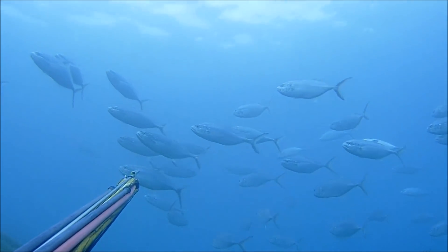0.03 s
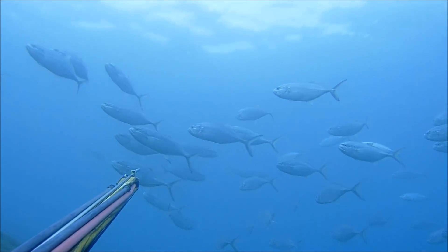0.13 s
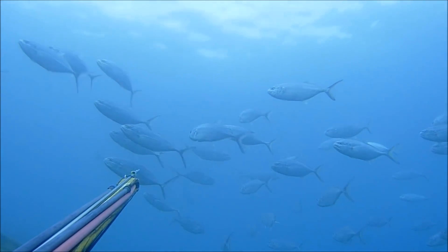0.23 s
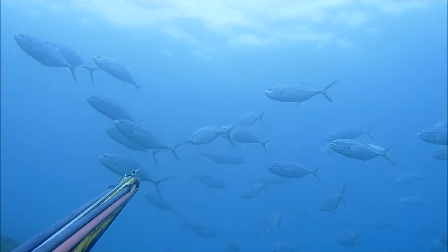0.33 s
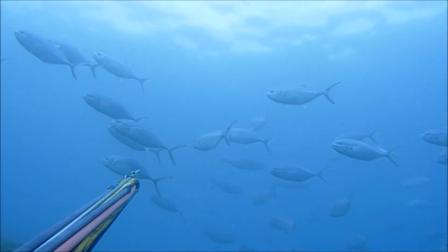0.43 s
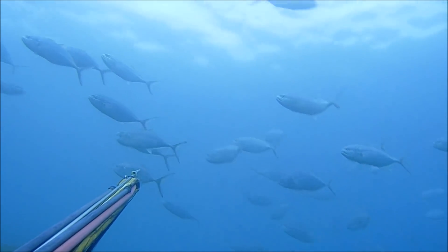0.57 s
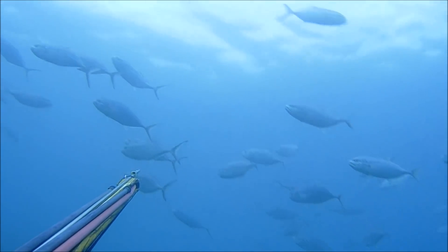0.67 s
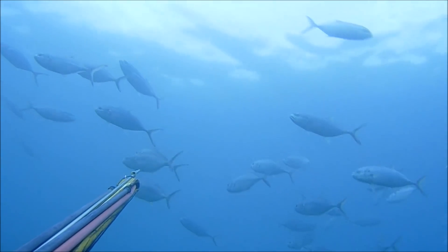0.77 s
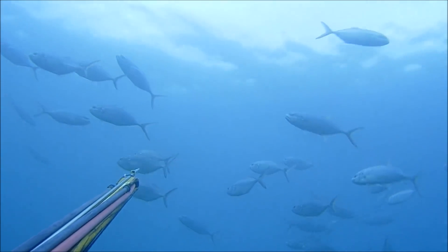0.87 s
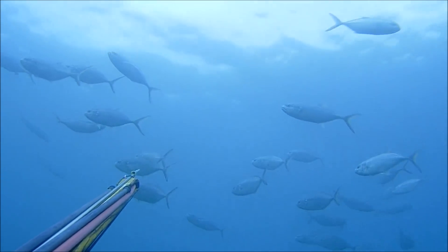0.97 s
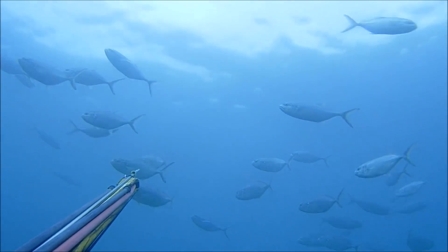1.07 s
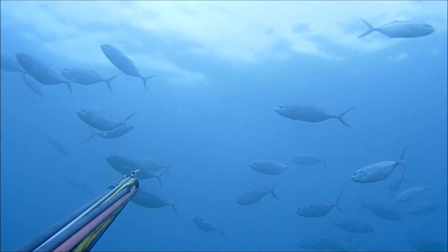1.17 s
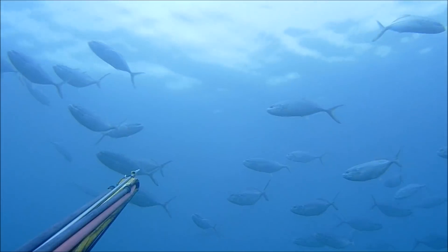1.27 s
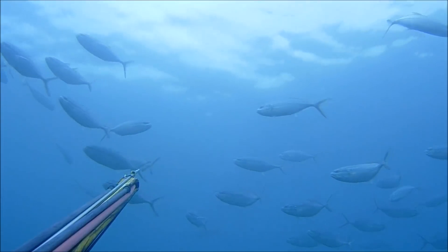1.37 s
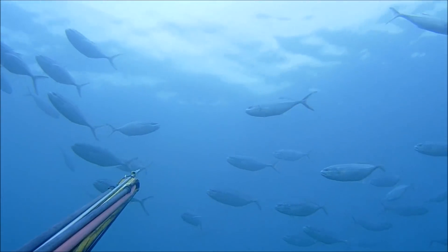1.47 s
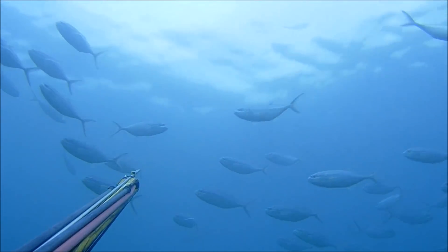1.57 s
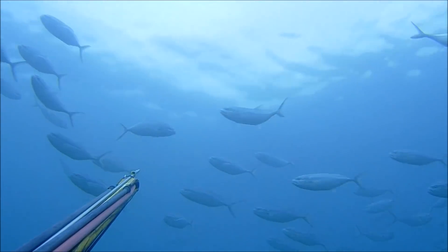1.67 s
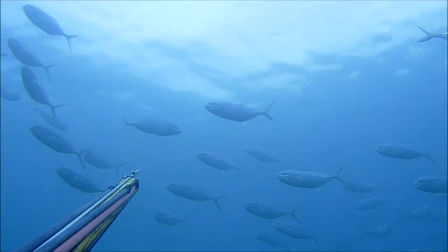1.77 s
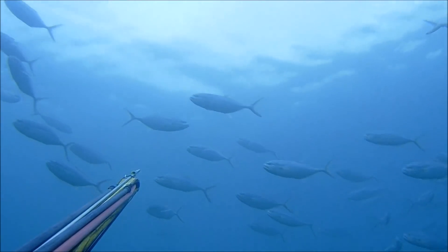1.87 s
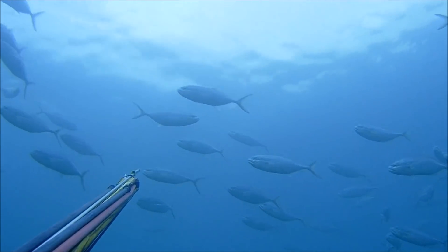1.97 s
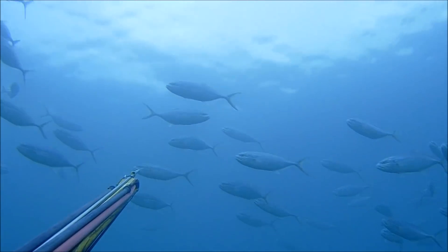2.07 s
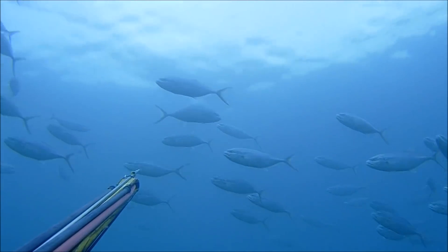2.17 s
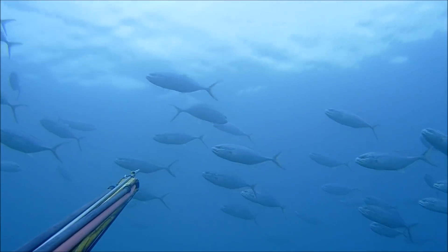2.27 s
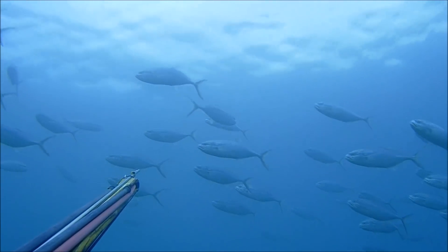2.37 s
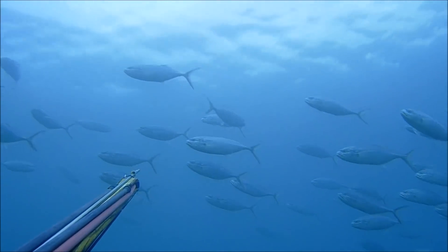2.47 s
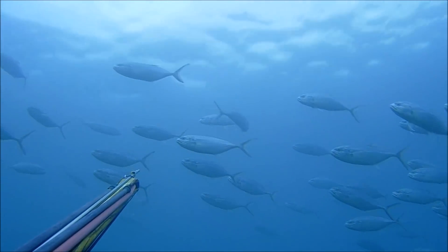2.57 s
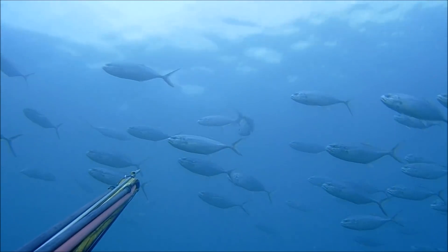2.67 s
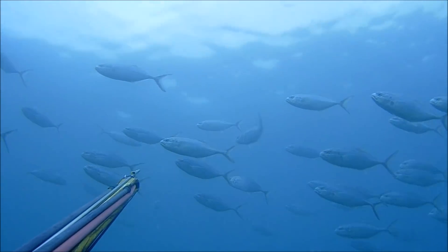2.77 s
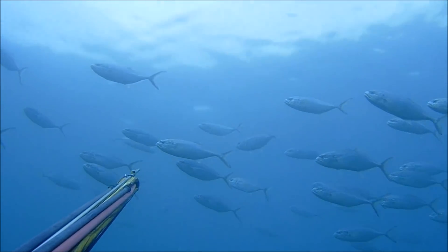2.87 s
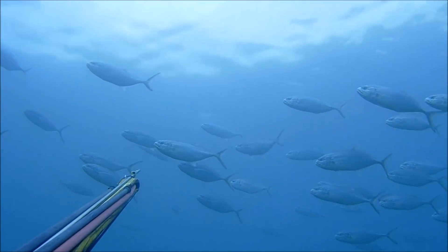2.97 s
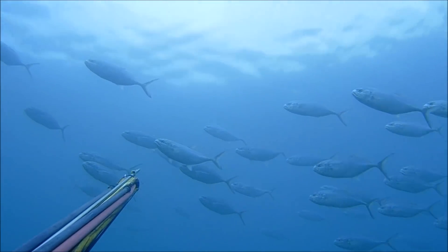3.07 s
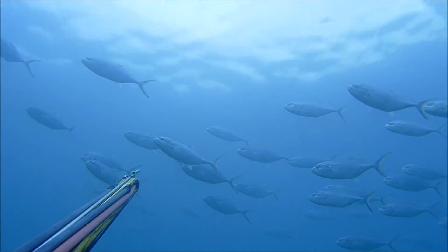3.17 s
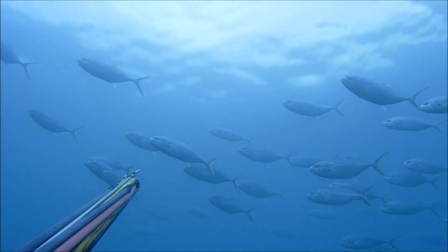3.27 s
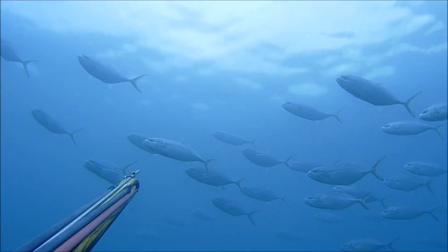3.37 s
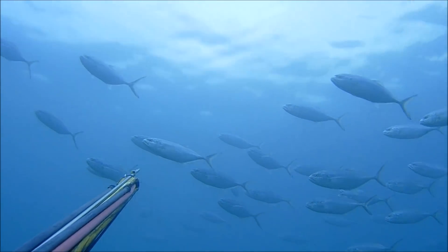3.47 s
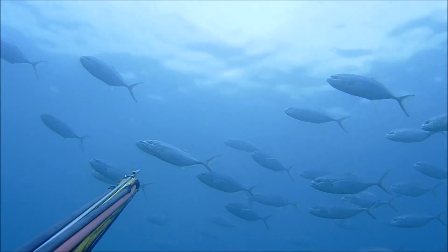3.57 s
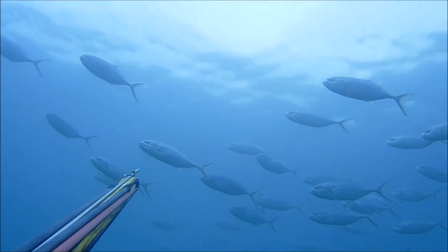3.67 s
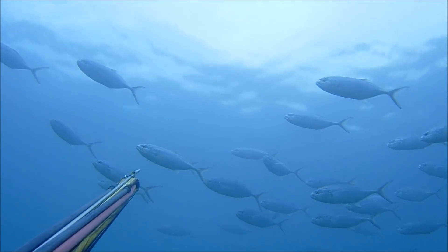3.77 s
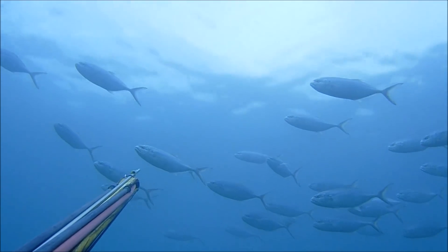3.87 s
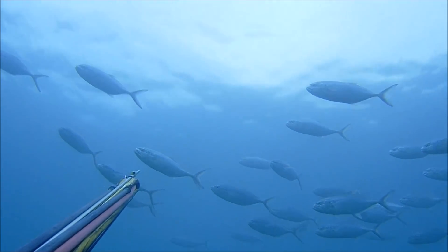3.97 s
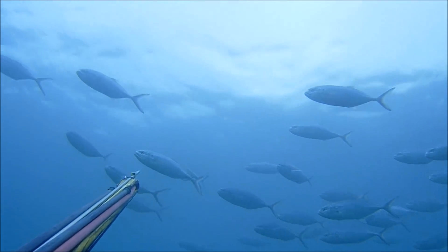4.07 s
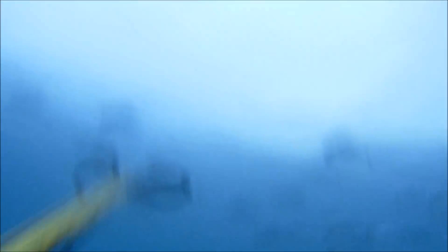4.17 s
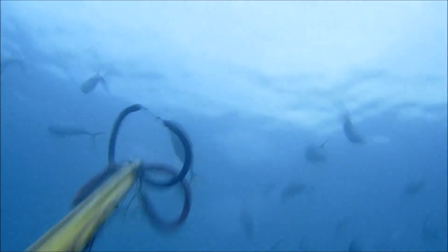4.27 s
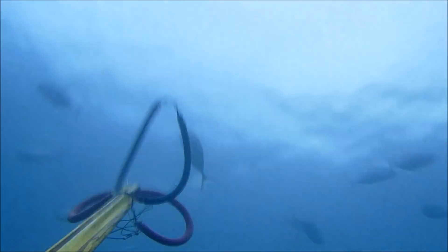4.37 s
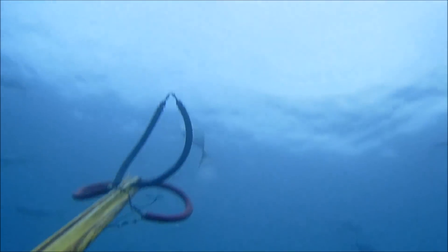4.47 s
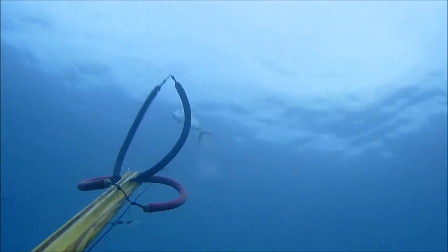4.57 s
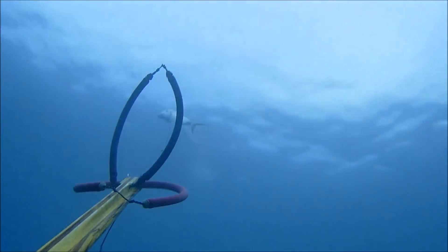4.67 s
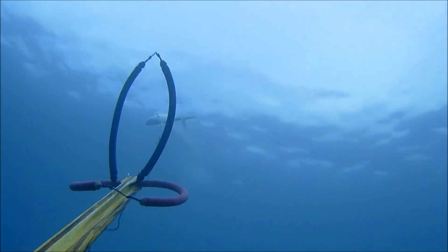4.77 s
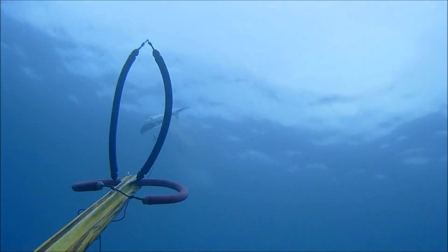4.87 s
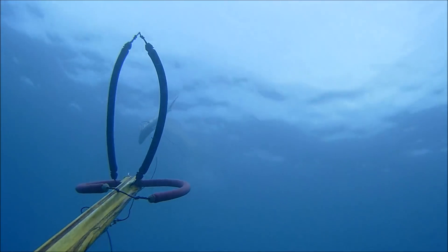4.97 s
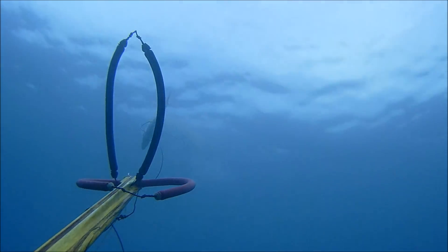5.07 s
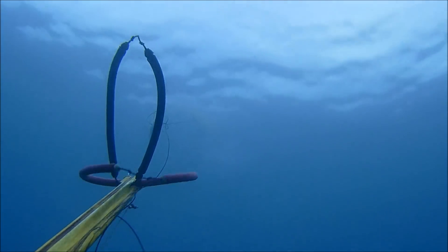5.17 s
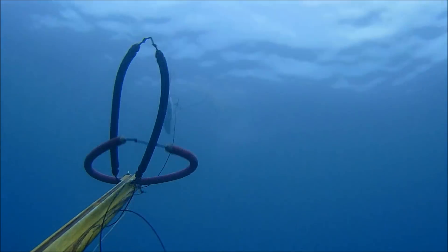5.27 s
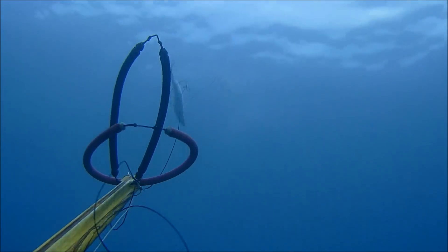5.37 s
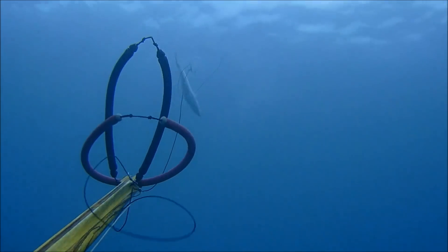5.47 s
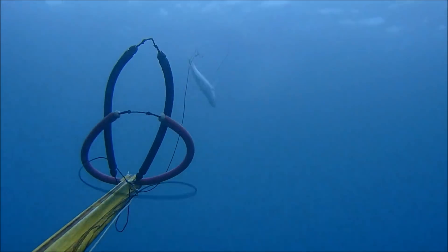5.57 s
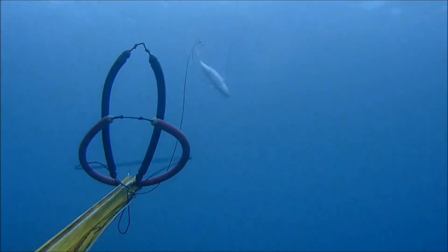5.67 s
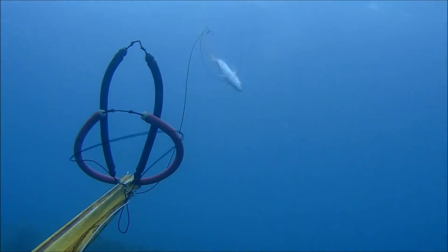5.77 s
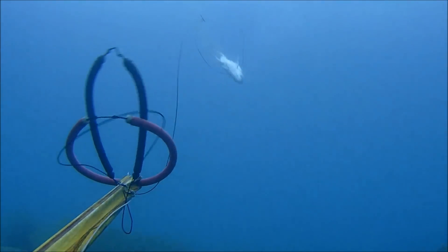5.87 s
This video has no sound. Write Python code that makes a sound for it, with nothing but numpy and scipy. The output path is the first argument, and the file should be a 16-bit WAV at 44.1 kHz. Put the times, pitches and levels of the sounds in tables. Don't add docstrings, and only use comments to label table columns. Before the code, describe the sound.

Beneath the sea, muffled water and tiny ticks are broken by one harsh, overloaded speargun shot, followed by clattering bands and a few faint bubbles.

```python
import sys
import numpy as np
from scipy import signal
from scipy.fft import rfft, irfft
from scipy.io import wavfile
from scipy.ndimage import uniform_filter1d

SR = 44100
rng = np.random.default_rng(int(sys.argv[2]) if len(sys.argv) > 2 else 0)


def attenuation_scalar(level_db):
    decades = np.asarray(level_db, float) / 20
    return 10 ** decades


def dump(signal):
    limited = np.clip(np.atleast_2d(signal).T, -1, 1)
    pcm = np.round(limited * 32767).astype(np.int16)
    wavfile.write(sys.argv[1], SR, pcm)


N = 261072


def curve(rows):
    times, values = np.transpose(rows)
    return np.interp(np.arange(N) / SR, times, values)


def unit(x):
    return x / np.sqrt(np.mean(x ** 2))


def band(x, lo_hz, hi_hz, order=2):
    return signal.sosfilt(signal.butter(order, [lo_hz, hi_hz], "band", fs=SR, output="sos"), x)


def walk(rate):
    hold = int(SR / rate)
    steps = np.repeat(rng.standard_normal(N // hold + 1), hold)
    return 1.3 * uniform_filter1d(uniform_filter1d(steps, hold), hold)[:N]


def swells(rows, rest_db):
    t = np.arange(N) / SR
    return attenuation_scalar(rest_db) + sum(attenuation_scalar(db) * np.exp(-((t - s) / half) ** 2) for s, half, db in rows)


def kick(peak_db, hold_s, fade_db_per_s):
    age = np.arange(N) / SR - 4.16
    rise = np.clip(age / 0.0067, 0, 1)
    return rise * attenuation_scalar(peak_db - fade_db_per_s * np.maximum(age - hold_s, 0))


def grit(rate, scatter_db):
    hit = rng.random(N) < rate / SR
    size = np.minimum(rng.exponential(size=N), 3)
    return unit(hit * attenuation_scalar(scatter_db * size) * rng.standard_normal(N))


def ring(x, modes):
    out = 0
    for hz, db, t60 in modes:
        pole = np.exp((2j * np.pi * hz - np.log(1000) / t60) / SR)
        out = out + attenuation_scalar(db) * signal.lfilter([1], [1, -pole], x + 1e-18).imag
    return out


def struck(modes, push, detune, lean_db=0):
    age = np.arange(3000) / SR
    out = 0
    for (hz, db, t60), off in zip(modes, detune):
        octaves_up = np.log2(hz / modes[0][0])
        tone = np.sin(2 * np.pi * hz * (1 + off) * age) * np.exp(-np.log(1000) * age / t60)
        out = out + attenuation_scalar(db + lean_db * octaves_up) * tone
    out = np.convolve(out, push)[:len(age)]
    return out / np.abs(out).max()


def snap(noise, lo_hz, hi_hz, fade_ms):
    fade = np.exp(-np.arange(len(noise)) / SR / (fade_ms / 1000))
    out = band(noise * fade, lo_hz, hi_hz, order=1)
    return out / np.abs(out).max()


def add(out, s, sound):
    i = int(s * SR)
    out[i:i + len(sound)] += sound[:N - i]


# f/Hz, level/dB per Hz
WATER_SPECTRUM = [(35, -33), (60, -5), (160, -1), (274, 0.5), (398, -2), (566, -3.5), (621, -4),
                  (1780, -16), (3270, -22), (3580, -17), (5090, -26), (14900, -31.5), (16000, -39)]


def water():
    out, swell = 0, walk(3.34)
    hzs, dbs = np.transpose(WATER_SPECTRUM)
    for hz in 70 * 2 ** np.arange(0, 8, .5):
        db = np.interp(np.log(hz), np.log(hzs), dbs) + 10 * np.log10(hz)
        db = db + 0.9 * swell + 0.2 * walk(12)
        out = out + attenuation_scalar(db) * unit(band(rng.standard_normal(N), hz * 2 ** -.25, hz * 2 ** .25))
    return attenuation_scalar(-53) * unit(out)


# f/Hz, level/dB, t60/s
SHELL_HIGH = [(2257, -5, 0.024), (2497, -4.5, 0.049), (2628, -7.5, 0.05), (3116, 0, 0.0091),
              (3585, 2, 0.02), (3884, -7, 0.038), (4707, -13, 0.049), (6010, -13, 0.023)]
# centre t/s, half width/s, level/dB
FIZZ = [
    (.45, 0.28, -52.5),
    (.93, 0.14, -60.5),
    (1.65, .12, -66.5),
    (2.8, 0.079, -69),
    (3.68, 0.28, -69),
    (5.25, 0.19, -67),
    (5.9, 0.15, -70),
]


def fizz():
    modes = sum(ring(grit(1800, scatter_db=2.0), [(hz, db, .6 * t60)]) for hz, db, t60 in SHELL_HIGH)
    flicker = attenuation_scalar(-4.5 + 1.8 * walk(8.2))
    return swells(FIZZ, rest_db=-64) * flicker * unit(modes)


# centre t/s, half width/s, level/dB
SURGES = [
    (1.4, .15, -65),
    (3.5, 0.26, -58),
    (4.75, 0.33, -51),
    (5.6, .4, -59.5),
]


def motion():
    sway = unit(band(rng.standard_normal(N), 18, 38, order=3))
    sway_gain = swells(SURGES, rest_db=-63) + kick(-25.5, -0.0039, 126)
    barrel = [(115.6, 1, 0.1), (144, -15, 0.17), (208.4, -8.5, 0.16), (250, -4, 0.025)]  # Hz, dB, t60 s
    hum = unit(ring(rng.standard_normal(N), barrel))
    hum_gain = attenuation_scalar(-65) + kick(-14, 0.1087, 166) + kick(-30, 0, 43.5)
    return sway_gain * sway + attenuation_scalar(-1) * hum_gain * hum


def scrapes(rows):
    out, ms = np.zeros(N), np.arange(1500) / SR * 1000
    for s, db, lean_db, snap_db, scrape_ms in rows:
        noise = rng.standard_normal(3000)
        push = noise[:1500] * (np.exp(-ms / scrape_ms) + attenuation_scalar(-11.5) * np.exp(-ms / 11))
        modes = [(hz, g + 3 * rng.standard_normal(), .7 * t60) for hz, g, t60 in SHELL_HIGH]
        body = struck(modes, push, 0.03 * rng.standard_normal(8), lean_db)
        wide = snap(noise, 2400, 4100, fade_ms=0.69 * scrape_ms)
        bare = snap(noise, 6000, 7700, fade_ms=1.14 * scrape_ms)
        add(out, s, attenuation_scalar(db) * (body + attenuation_scalar(-16.5) * wide + attenuation_scalar(snap_db + 6.5) * bare))
    return out


# t/s, peak level/dB, lean to the upper modes/dB per octave, bare snap level/dB
TICKS = [(0.0729, -42.5, 4, -14.5), (0.1005, -44, -4, -11), (0.224, -44.5, 11, -30),
         (0.2378, -41.5, 7, -24), (0.709, -45, -19, -28), (0.67, -39.5, -16, -29), (0.8641, -23.5, -1, -40),
         (1.022, -44.5, 2, -26), (1.5465, -29.5, -4, -32), (1.6701, -31, -12, -33), (1.812, -43, -9, -28),
         (2.0414, -41.5, 11, -13), (2.052, -47, 5, -20), (2.134, -42, 13, -27), (2.3428, -31.5, -12, -25),
         (2.394, -41, 20, -3), (2.6044, -31, -7, -33), (2.7396, -44, -5, -25), (2.8001, -40, -15, -27),
         (2.85, -43, 12, -18), (3.1143, -43.5, 4, -17), (3.478, -38, 3, -6), (3.686, -38.5, 10, -20),
         (4.0617, -47, 11, -17), (4.104, -41, -3, -19), (5.4817, -39.5, -3, -15), (5.8693, -36, 2, -31),
         (5.875, -44, -10, -31), (2.76, -48, -6, -30), (2.775, -45, -10, -30)]


def ticks():
    return scrapes([(*row, 0.91) for row in TICKS])


# t/s, peak level/dB
CRACKLE = [
    (4.9394, -51),
    (5.0799, -51),
    (5.1148, -47),
    (5.1502, -44),
    (5.1855, -41.5),
    (5.257, -45.5),
    (5.284, -48),
    (5.3376, -43),
    (5.3951, -44),
]


def crackle():
    return scrapes([(s, db + 1.5, -7, -32, 0.91) for s, db in CRACKLE])


# t/s, peak level/dB, bare snap level/dB
RATTLE = [(4.158, -26, -20), (4.2302, -8, -16), (4.268, -25, -23), (4.291, -29, -8), (4.306, -16.5, -1.5),
          (4.33, -40, -1), (4.3638, -38, 2.5), (4.398, -46, -17), (4.429, -30, -33), (4.469, -42, -25),
          (4.564, -40, -17), (4.6076, -44, -24), (4.7623, -44.5, -17.5), (4.806, -47.5, -24.5)]


def rattle():
    return scrapes([(s, db, 2.5, snap_db, 1.7) for s, db, snap_db in RATTLE])


# f/Hz, level/dB, t60/s
SHELL_LOW = [(216, -10, 0.027), (312, -9.5, 0.022), (452, 0, 0.024), (532, -2, 0.034), (697.3, 2.5, 0.029),
             (860, -11.5, 0.016), (1010, -2, 0.013)]
SHELL_MID = [(1389, 0, 0.03), (1508, 6.5, 0.018), (1605, -4.5, 0.031), (1850, -18, 0.0084)]


def knocks(rows):
    out = np.zeros(N)
    rise = 1 - np.exp(-(np.arange(3000) / SR / 0.0013) ** 2)
    for s, db, mid_db, crack_db, soft_ms in rows:
        push = np.hanning(int(soft_ms * SR / 1000) + 3)[1:-1]
        low = struck(SHELL_LOW, push, 0.051 * rng.standard_normal(7))
        mid = struck(SHELL_MID, push, 0.062 * rng.standard_normal(4))
        crack = snap(rng.standard_normal(3000), 2600, 3500, fade_ms=2.06)
        add(out, s, attenuation_scalar(db + 5.5) * rise * (low + attenuation_scalar(mid_db + 7) * mid + attenuation_scalar(crack_db + 1.5) * crack))
    return out


# t/s, peak level/dB, mid modes level/dB, softness of contact/ms
NUDGES = [(0.869, -52, 6, 0.46), (0.913, -33, -13, 0.29), (0.943, -30, -25, 0.62), (1.089, -25, -23, 0.23),
          (5.868, -47.5, 2, .2), (5.34, -35, -29, 0.35), (0.27, -36, -14, 0.26), (1.217, -39, -23, 0.3),
          (1.533, -29, -7.5, 0.22), (1.938, -24.5, -21.5, 0.76), (3.519, -27, -20.5, 0.42),
          (3.787, -23, -18.5, 0.33), (4.986, -32, -21, 0.22), (5.396, -34, -25, 0.85)]


def nudges():
    return knocks([(s, db, mid_db, -30.5, soft_ms) for s, db, mid_db, soft_ms in NUDGES])


# t/s, peak level/dB, mid modes level/dB, crack level/dB
SLAPS = [(4.235, -1.5, -7, -6.5), (4.245, 2, -25, -17.5), (4.267, -5.5, -4, -8.5), (4.271, 1.5, -21, -20),
         (4.281, -14, -3, -13), (4.292, -9, 2, 1), (4.306, -5.5, -5, -8), (4.31, 4, -16.5, -18),
         (4.323, -23, 0, -1), (4.332, -7, -20, -33), (4.35, -0.5, -16.5, -26.5), (4.381, 4.5, -18.5, -16.5),
         (4.386, -6, -19.5, -20), (4.399, -13, -12, -24), (4.429, -12, -11.5, -45), (4.468, -27, -36, -28),
         (4.505, -16.5, -9.5, -31), (4.545, -30, -29, -28), (4.582, -12, -14, -26.5),
         (4.655, -25, -18, -36), (4.732, -21, -20.5, -41)]


def slaps():
    return knocks([(*row, 0.35) for row in SLAPS])


# t/s, f/Hz, level/dB, t60/s
RECOIL = [
    (4.171, 13.1, -6, 0.81),
    (4.201, 46.6, -6.5, 0.31),
]


def recoil():
    out = 0
    for s, hz, db, t60 in RECOIL:
        age = np.maximum(np.arange(N) / SR - s, 0)
        fade = np.exp(-np.log(1000) * age / t60) * np.minimum(age / 0.024, 1)
        out = out + attenuation_scalar(db) * np.sin(2 * np.pi * hz * age) * fade
    return out


# t/s, blow level at the input/dB
RELEASE = [
    (4.16, -32),
    (4.1625, 20.5),
    (4.178, -0.5),
    (4.22, -7),
    (4.228, -9),
    (4.245, -16),
    (4.29, -20.5),
    (4.35, -39),
    (4.6, -62.5),
]


def release():
    t = np.arange(N) / SR
    blow_db = np.where(t < RELEASE[0][0], -120, curve(RELEASE))
    treble_db = np.where(t < 4.223, -14.5, -23.5)
    blows = grit(2500, scatter_db=3.5)
    thinned = band(blows, 624, 6000, order=1)
    low = unit(ring(thinned, SHELL_LOW)) + attenuation_scalar(-9.5) * unit(ring(blows, SHELL_MID))
    high = unit(ring(blows, SHELL_HIGH)) + attenuation_scalar(-40) * unit(band(blows, 1700, 8400))
    return attenuation_scalar(blow_db) * (low + attenuation_scalar(treble_db) * high)


def scene():
    background = water() + fizz() + motion()
    contacts = ticks() + crackle() + rattle() + nudges() + slaps()
    return (background + contacts + recoil() + release())[None]


# t/s, level/dB
CEILING = [
    (4.192, -6),
    (4.203, -3),
    (4.222, -3),
    (4.23, -6),
]


def overload(dry):
    top = attenuation_scalar(curve(CEILING))
    drive = dry / top
    squared = top * drive / (1 + drive ** 8) ** (1 / 8)
    return signal.sosfilt(signal.butter(1, 6, "high", fs=SR, output="sos"), squared)


# t/s, kept below f/Hz, loss level/dB
DROPOUTS = [(.258, 5000, -12), (0.876, 4950, -31), (.92, 4320, -13), (1.262, 5500, -10), (1.9, 4200, -12),
            (2.52, 4500, -15), (3.974, 4000, -10), (4.213, 4100, -4), (4.216, 6900, -40),
            (5.016, 4300, -11), (5.357, 4200, -13), (5.463, 5000, -4), (5.613, 4830, -11)]


def dropouts(x):
    out = x.copy()
    for s, hz, db in DROPOUTS:
        near = np.arange(int((s - .04) * SR), int((s + .04) * SR))
        fade = np.exp(-((near / SR - s) / .012) ** 4 / 2)
        spec = rfft(out[0, near] * fade)
        f = np.arange(len(near) // 2 + 1) * SR / len(near)
        size = uniform_filter1d(np.abs(spec), size=5)
        size = size / uniform_filter1d(size, size=60)
        weak = (f > 900) & (size < np.quantile(size, .75))
        out[0, near] -= (1 - attenuation_scalar(db)) * fade * irfft(spec * (weak | (f > hz)), len(near))
    return out


def top_cut(x):
    return signal.sosfilt(signal.butter(12, 16980, fs=SR, output="sos"), x)


def record(dry):
    heard = dropouts(overload(dry))
    mix = signal.sosfilt(signal.ellip(8, .2, 60, 16000, fs=SR, output="sos"), heard)
    return top_cut(mix)


dry = scene()
out = record(dry)
dump(out)
```